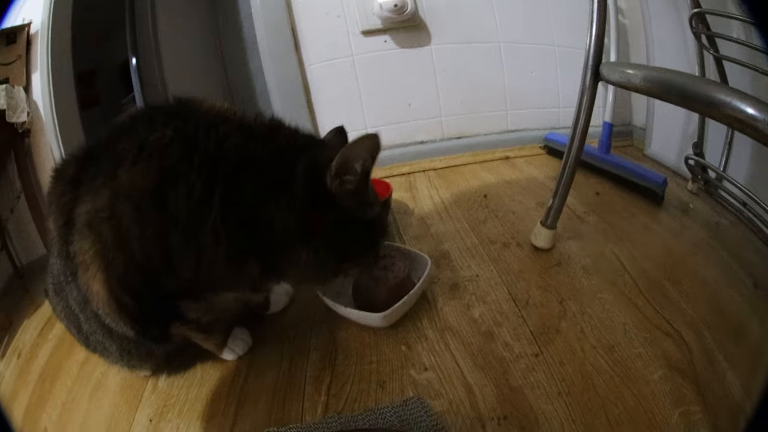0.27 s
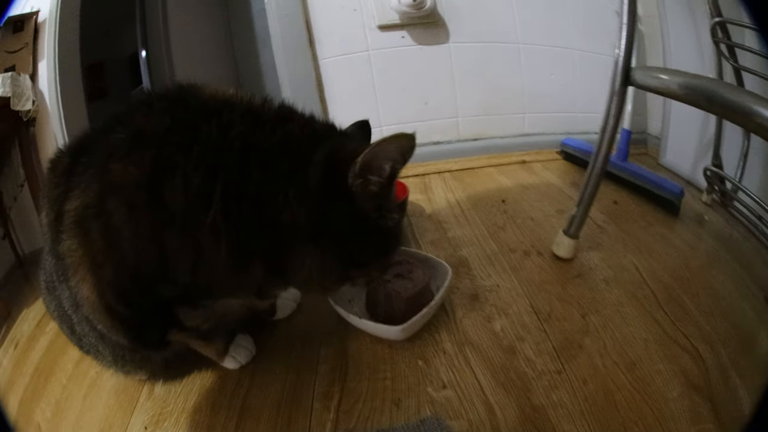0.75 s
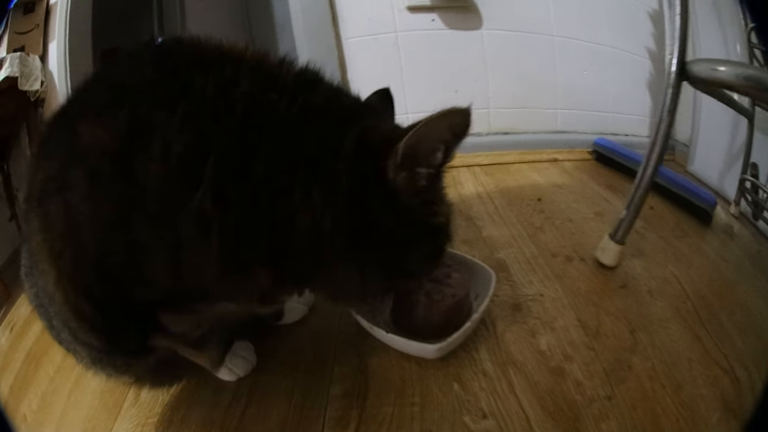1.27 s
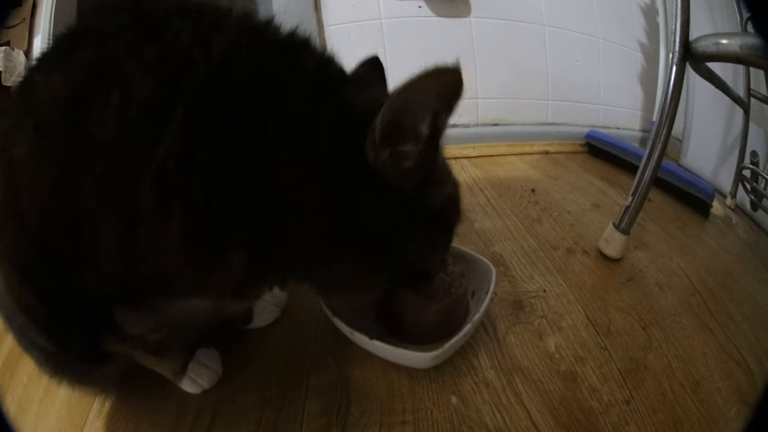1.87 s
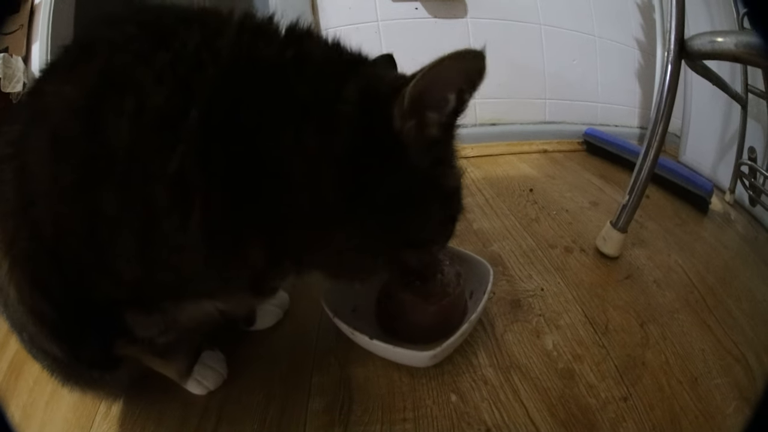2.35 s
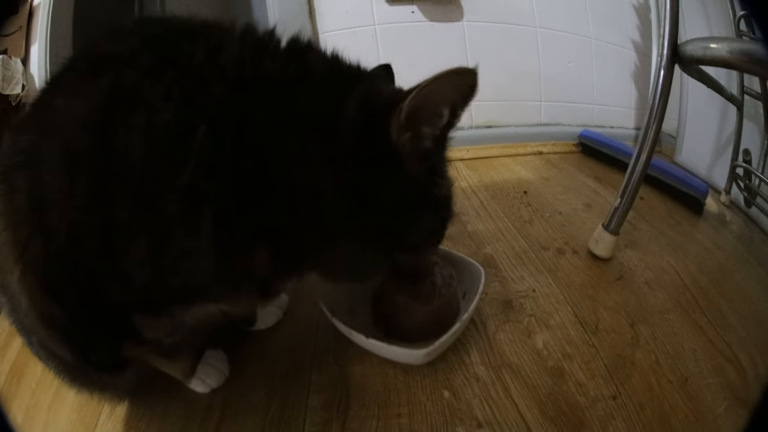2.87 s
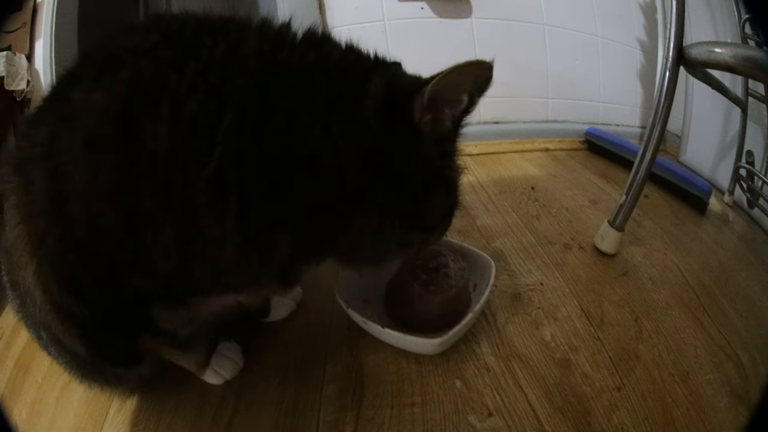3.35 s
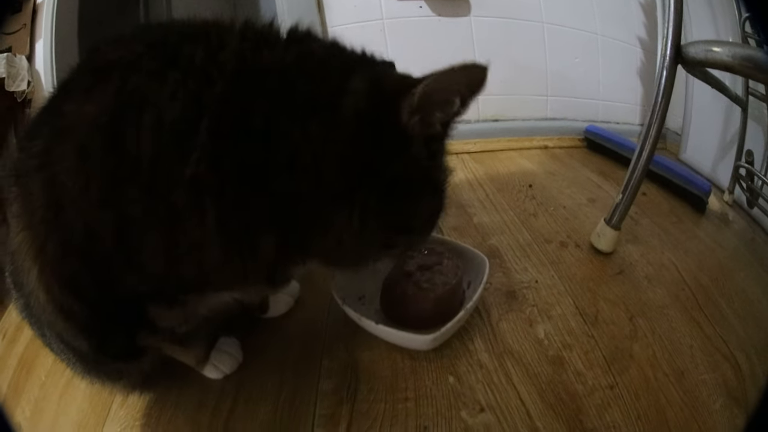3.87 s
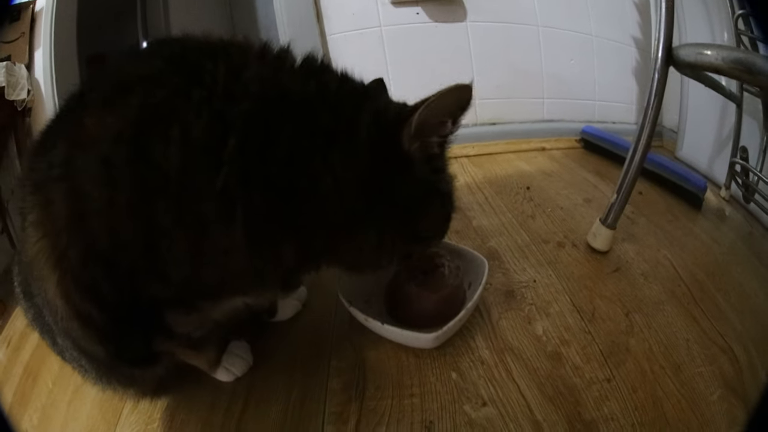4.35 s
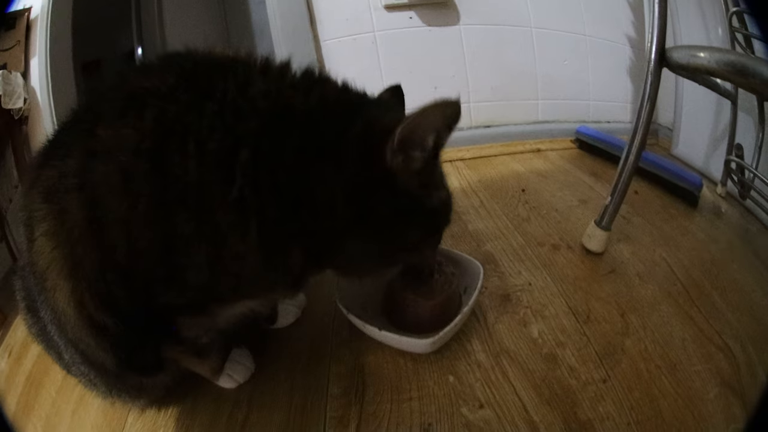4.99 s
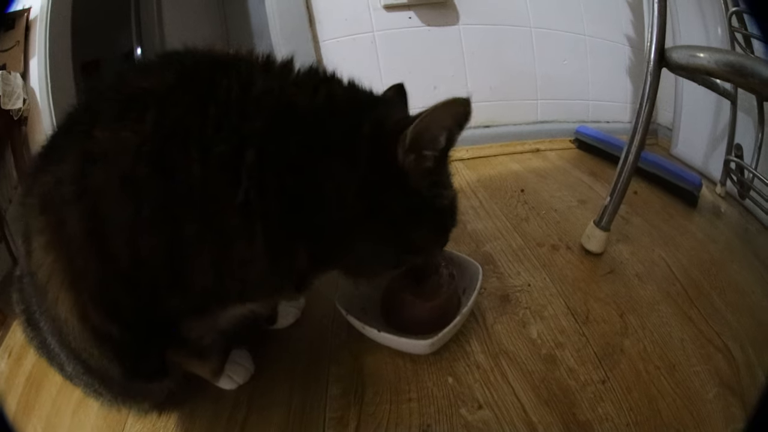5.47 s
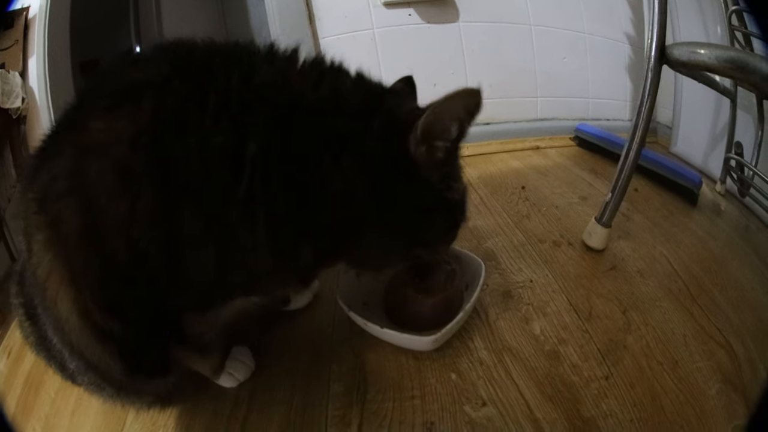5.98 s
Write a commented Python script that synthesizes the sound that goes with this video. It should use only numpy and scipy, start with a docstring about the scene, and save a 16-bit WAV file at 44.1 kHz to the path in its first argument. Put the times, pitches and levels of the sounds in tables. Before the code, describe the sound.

Close, wet cat chewing: irregular smacks and bright sticky ticks, small fizzy squelches, the bowl tapping and briefly scraping on the floor.

```python
"""A cat eats wet food from a plastic bowl on a kitchen floor, close to the microphone.
Pockets of air pop dully in its mouth and films of saliva snap brightly, each followed by smaller bursts;
in between, swells of tiny bubbles make the food squelch. The muzzle rocks the bowl, so its own notes ring
as it knocks on the floor, and once it slides with many small slips. Echoes and a short tail come from the
kitchen, over faint room air; a noise suppressor turns down the quietest parts."""
import sys
import numpy as np
from scipy import signal
from scipy.fft import rfft, irfft, next_fast_len
from scipy.io import wavfile
from scipy.ndimage import uniform_filter1d

SR = 44100
rng = np.random.default_rng(int(sys.argv[2]) if len(sys.argv) > 2 else 0)


def output_pcm(signal):
    """Save a mono or channel-first signal as 16-bit PCM at the path in sys.argv[1].

    Samples are clipped to [-1, 1] before scaling.
    """
    pcm = np.clip(np.atleast_2d(signal).T, -1, 1) * 32767
    wavfile.write(sys.argv[1], SR, np.round(pcm).astype(np.int16))


N = 274302  # length of the scene in samples
TAPS = 4096  # length of one short pulse in samples
HZ = np.fft.rfftfreq(TAPS, 1 / SR)  # the frequencies at which a pulse is shaped


def amp(db):
    """Turns decibels into a gain."""
    return 10 ** (np.asarray(db) / 20)


def evened(x):
    """Scales a signal to rms 1."""
    return x / np.sqrt(np.mean(x ** 2) + 1e-20)


def smoothed(grid, bins, frames):
    """Averages a grid over neighbouring frequency bins and time frames."""
    return uniform_filter1d(uniform_filter1d(grid, bins, 0), frames, 1)


def read(points, hz):
    """Reads a table of (Hz, value) points on a log-frequency axis."""
    f, value = np.transpose(points)
    return np.interp(np.log(hz + 1), np.log(f + 1), value)


def add(mix, s, sound):
    """Mixes a stereo sound in at time s, cutting off whatever falls outside the scene."""
    start = round(s * SR)
    sound = sound[:, max(-start, 0):]
    part = mix[:, max(start, 0):][:, :sound.shape[1]]
    part += sound[:, :part.shape[1]]


def coloured(x, points):
    """Filters a signal by a table of (Hz, dB) points."""
    size = x.shape[-1]
    return irfft(rfft(x) * amp(read(points, np.fft.rfftfreq(size, 1 / SR))), size)


def bump(hz, octaves, steep=1.13):
    """Gain of a heavily damped resonance; octaves sets how far it reaches to each side."""
    return (1 + (np.log2((HZ + 1) / hz) / octaves) ** 2) ** -steep


def above(hz, order):
    """Gain of a body that radiates little below its lowest note."""
    return (1 + (hz / (HZ + 1)) ** (2 * order)) ** -.5


def click(gain):
    """Pulse that starts at once, with this spectrum and the energy of one millisecond at rms 1."""
    log_gain = np.log(np.maximum(gain / gain.max(), 1e-4))
    circle = np.concatenate([log_gain, log_gain[-2:0:-1]])
    # the Hilbert transform gives the phase that packs the energy to the front (minimum phase)
    pulse = irfft(np.exp(np.conj(signal.hilbert(circle)))[:len(HZ)])
    return pulse * np.sqrt(SR / 1000 / np.sum(pulse ** 2))


def placed(x, pan_db, lag_s):
    """Makes stereo: left is pan_db louder than right, and lag_s later as the bowl lies to the right."""
    size = next_fast_len(len(x) + 64)
    turn = np.exp(-2j * np.pi * np.fft.rfftfreq(size, 1 / SR) * lag_s)
    late = irfft(rfft(x, size) * turn, size)[:len(x)]
    ears = np.array([late * amp(pan_db / 2), x * amp(-pan_db / 2)])
    return ears / np.sqrt(np.mean(amp([pan_db, -pan_db])))  # same total power wherever it sits


def grains(size, per_s, spread_db):
    """Sparse train of tiny bursts of uneven strength and random sign."""
    strength = amp(spread_db * np.minimum(rng.exponential(1, size), 4))
    return strength * rng.choice([-1, 1], size) * (rng.random(size) < per_s / SR)


def flurry(before_db, before_s, after_db, after_s, per_s):
    """One main impulse, a quarter of the way in, in a soft-edged spray of tiny ones that thins out to both sides."""
    t = (np.arange(TAPS) - TAPS // 4) / SR
    beads = grains(TAPS, per_s, spread_db=1.0)
    before = beads * (t < 0) * np.exp(-abs(t) / before_s)
    after = beads * (t > 0) * np.exp(-abs(t) / after_s)
    return (t == 0) + (amp(before_db) * evened(before) + amp(after_db) * evened(after)) / np.sqrt(TAPS)


def burst(hz, octaves, skirt, edge_octaves, uneven_db, edge_share=1.0, leak_db=-36, count=48):
    """A bubble or film gives way: a damped ring over a faint tick, cut off steeply underneath."""
    off = 2 * np.log2((HZ + 1) / hz) / octaves  # 1 at the half-power points of the ring
    ring = (1 + (2 ** (1 / skirt) - 1) * off ** 2) ** (-skirt / 2) + amp(leak_db)
    # random ripples in the spectrum: never twice the same shape
    shape = amp(uneven_db * evened(signal.resample(rng.standard_normal(count), len(HZ))))
    return click(shape * ring * above(hz * 2 ** -(edge_octaves + edge_share * octaves), order=9))


def cluster(row, skirt, edge_octaves, first_s, last_s, below_db, ceiling_db, fade_db_per_s,
            spread_db, spread_octaves, sag_octaves_per_s, count):
    """Smaller bursts after a main one, each at its own moment and pitch; they ring lower as the jaw opens."""
    s, hz, octaves, db, pan_db = row
    for _ in range(count):
        late = first_s + (last_s - first_s) * rng.uniform(0.12, 1) ** 2  # squared: most come early
        level_shift, pitch_shift, pan_shift = rng.uniform(-0.76, 1, 3)
        level = min(db + below_db, ceiling_db) - fade_db_per_s * late + spread_db * level_shift
        pitch = hz * 2 ** (spread_octaves * pitch_shift - sag_octaves_per_s * late)
        ring = burst(pitch, octaves / 2 + 0.2, skirt, edge_octaves, uneven_db=3.5)
        yield s + late, placed(amp(level) * ring, pan_db + 2 * pan_shift, lag_s=8e-5)


def quiet(level_db=-88, shared=1.0, patchy_db=4.0, patchy_hz=1500):
    """Faint air of the room, partly common to both ears; its low end comes and goes in patches."""
    # Colour of the still kitchen. Each row: frequency in Hz, level in dB.
    air_colour = [(15, -29), (25, -17), (76, -4), (175, -9.5), (373, -12), (700, -15), (1000, -19),
                  (1610, -20), (16000, -21.5)]
    air = rng.standard_normal((2, N)) + shared * rng.standard_normal(N)
    hz, _, z = signal.stft(coloured(air, air_colour), SR, nperseg=1024, noverlap=768)
    patches = evened(smoothed(rng.standard_normal(z.shape[1:]), bins=4, frames=12))
    z = z * amp(patchy_db * patches / (1 + (hz[:, None] / patchy_hz) ** 2))
    return amp(level_db) * evened(signal.istft(z, SR, nperseg=1024, noverlap=768)[1][:, :N])


def squelches(bubbles_per_s=1100, reach=2.0, pan_db=-1.5):
    """The tongue presses into the food, and a swell of minute bubbles bursts in the jelly."""
    # Each row: start in seconds, length in seconds, level in dB, centre in Hz, reach to each side in octaves.
    presses = [(0, 0.016, -53.5, 10500, 0.64), (0.708, 0.052, -75.5, 2200, 1.47),
               (0.412, 0.055, -71, 3520, 0.22), (0.413, 0.057, -81, 1410, 0.62),
               (0.571, 0.044, -66, 4870, 0.28), (0.962, 0.034, -68, 4580, .4),
               (0.992, 0.061, -72.5, 2260, 0.91), (0.993, 0.049, -65, 5400, 0.78),
               (1.1, 0.052, -75.5, 8000, 0.69), (1.336, 0.05, -53, 9100, 0.83),
               (1.462, 0.063, -78.5, 1230, 1.7), (1.469, 0.25, -68.5, 10400, 1.48),
               (1.734, 0.19, -74, 9400, 1.05), (2.227, 0.056, -89, 2176, 0.26),
               (2.793, 0.054, -88, 2120, 0.19), (3.271, 0.033, -76, 10500, 0.94),
               (3.277, 0.038, -82.5, 1714, 0.17), (3.42, 0.064, -76, 3400, 0.42),
               (3.883, 0.065, -82, 2010, 0.51), (5.066, 0.043, -84, 3400, 0.45),
               (5.349, 0.057, -56.5, 7300, 1.96), (6.11, 0.039, -64, 5940, 0.73)]
    out = np.zeros((2, N))
    for s, length, db, hz, octaves in presses:
        size = round(length * SR)
        ring = bump(hz, octaves, steep=1.3) * above(hz * 2 ** (-reach * octaves), order=4)
        fizz = signal.fftconvolve(grains(size, bubbles_per_s, spread_db=3.5), click(ring))[:size]
        swell = evened(fizz * signal.windows.tukey(size, .7))
        add(out, s, placed(amp(db) * swell, pan_db, lag_s=5e-5))
    return out


def pops(gain_db=-5.0, skirt=3.7, edge_octaves=0.21):
    """The tongue peels off the palate; the nearly shut mouth lets out only its cavity note."""
    # Pockets of air that pop. Each row: time in seconds, cavity note in Hz, width in octaves,
    # level in dB (the main pop also gets gain_db), left over right in dB.
    air_pockets = [(0.002, 5070, 0.37, -42.5, 0), (0.003, 2370, 0.22, -55, -4),
                   (0.1605, 3500, 0.23, -53, -4), (0.2059, 2400, 0.71, -32, -3.5),
                   (0.2837, 2800, 1.14, -29.5, -3), (0.293, 1844, 0.17, -29.5, -8.5),
                   (0.2943, 2770, 0.26, -30, -2), (0.3553, 2050, 0.37, -50, -2),
                   (0.414, 3200, 0.27, -48.5, 1), (0.5017, 3400, 0.94, -46, -2.5),
                   (0.5835, 4150, 0.54, -49, 2), (0.7282, 2300, 0.33, -52, -5), (0.739, 2174, 2.05, -62, 3),
                   (0.9775, 4230, 0.5, -45.5, -4), (1.0241, 3510, 0.98, -44.5, -3),
                   (1.244, 2790, 0.14, -51.5, -3), (1.2789, 2970, 0.57, -48.5, -6),
                   (1.3241, 2350, 0.49, -44, -8), (1.3624, 4200, 1.41, -43.5, -1),
                   (1.3976, 3700, 1.26, -43, -2.5), (1.51, 2310, 0.95, -56, -2),
                   (1.744, 2704, 0.17, -50.5, -3), (2.106, 3750, 0.31, -46.5, -8),
                   (2.117, 3120, 0.13, -48, -4), (2.13, 3390, 0.19, -60, -1),
                   (2.1298, 3470, 0.45, -35.5, -1.5), (2.147, 4450, 1.02, -43, -4),
                   (2.2138, 4740, 0.4, -45.5, -1), (2.2434, 2200, 0.35, -66, -6),
                   (2.2902, 2040, 0.3, -69.5, -4.5), (2.3777, 3750, 0.3, -44, -1.5),
                   (2.381, 3160, 0.22, -44.5, -4.5), (2.4715, 3910, 0.29, -40, -5),
                   (2.4819, 3980, 0.77, -37.5, -18), (2.487, 4700, 0.45, -30.5, 2),
                   (2.6544, 3110, 0.21, -42, -5), (2.8343, 2020, 0.24, -60.5, 0),
                   (2.9303, 3010, 0.54, -38, -1), (2.9368, 2940, 1.1, -40, -16),
                   (3.1656, 3400, 0.17, -47.5, -5), (3.1774, 3160, 0.23, -46.5, -1),
                   (3.1866, 2950, 0.44, -46.5, -9), (3.191, 3170, 0.28, -41, -1),
                   (3.21, 1800, 0.39, -46.5, -3.5), (3.2678, 3680, 0.14, -47, -1),
                   (3.3014, 1710, 0.15, -67.5, 0), (3.419, 3300, 0.24, -46, -1),
                   (3.4412, 3300, 0.34, -52.5, -11), (3.5857, 2380, 0.39, -41.5, -3.5),
                   (3.6753, 3530, 0.32, -61.5, 0), (3.7785, 2700, 0.39, -71, -10.5),
                   (3.8928, 2130, 0.21, -58, -8), (4.1485, 2730, 1.13, -45.5, 3),
                   (4.1653, 4040, 0.69, -22.0, 2), (4.1734, 3710, 1.27, -28.5, -2.5),
                   (4.248, 2220, 0.13, -48, -8), (4.5075, 3310, 0.63, -30, -3),
                   (4.5204, 5570, 0.3, -35, -2), (4.731, 5480, 0.26, -50.5, 2.5),
                   (4.797, 3430, 0.34, -48.5, 1), (4.8064, 3500, 0.32, -53, -21),
                   (4.9618, 1900, 0.27, -31, -5), (5.0852, 3270, 1.6, -62.5, -3.5),
                   (5.1896, 5040, 0.81, -43, 12), (5.4225, 3700, 0.5, -45, -1.5),
                   (5.4818, 2200, 0.6, -34, -1), (5.4866, 2200, 0.8, -36.5, -6.5),
                   (5.6165, 2600, 0.9, -47, -4), (5.6325, 3550, 0.36, -33.5, -2.5),
                   (5.674, 2500, 0.8, -41, -2), (5.8133, 1817, 0.25, -45, -6),
                   (5.9257, 3210, 0.13, -39.5, -0.5), (5.9937, 2760, 0.48, -50.0, -5.5),
                   (6.008, 2520, 0.45, -55, 0), (6.0511, 1727, 0.39, -39, -4.5),
                   (6.1289, 3330, 1.22, -43, -3), (6.147, 3560, 1.4, -56, 4),
                   (6.1595, 3430, 0.92, -39.5, -2.5)]
    out = np.zeros((2, N))
    for row in air_pockets:
        s, hz, octaves, db, pan_db = row
        drive = flurry(before_db=-23, before_s=0.009, after_db=-12, after_s=0.008, per_s=450)
        ring = burst(hz, octaves, skirt, edge_octaves, uneven_db=3.5)
        sound = amp(db + gain_db) * signal.fftconvolve(drive, ring)
        add(out, s - TAPS // 4 / SR, placed(sound, pan_db, lag_s=rng.uniform(-4e-6, 1e-4)))
        for small in cluster(row, skirt, edge_octaves, first_s=0.002, last_s=.04, below_db=-14.5,
                             ceiling_db=-53.5, fade_db_per_s=176.5, spread_db=0.0,
                             spread_octaves=0.16, sag_octaves_per_s=3.9, count=4):
            add(out, *small)
    return out


def snaps(gain_db=-1, skirt=4.1, edge_octaves=0.36):
    """A film of saliva breaks at the lips with one sharp tick; a few threads follow."""
    # Films that snap. Each row: time in seconds, centre in Hz, width in octaves,
    # level in dB (the main snap also gets gain_db), left over right in dB.
    films = [(0.2059, 9100, 0.88, -27, -3), (0.284, 9030, 0.37, -35, -3.5), (0.2946, 9100, 1.3, -29, -0.5),
             (0.355, 9560, 1.7, -48.5, 2), (0.5021, 8700, 0.22, -40.5, 1.5),
             (0.5198, 8700, 0.84, -47.5, -1.5), (0.5675, 12700, 0.66, -52, -2),
             (0.585, 13200, 0.47, -47, -5), (0.5999, 9000, 2.1, -50.5, -3), (0.9768, 9600, 0.5, -49, -3.5),
             (1.025, 8060, 0.61, -49.5, -2), (1.1253, 8550, 0.23, -63, -7), (1.3492, 7300, 0.74, -39, -6),
             (1.362, 8700, 0.42, -44.5, 1), (1.3712, 9800, 0.4, -39, -4), (1.3953, 6350, 1.07, -43.5, 3),
             (1.5508, 9100, 0.5, -38, -13), (1.564, 8080, 0.53, -45, 3), (1.5797, 7700, 0.57, -39, -9),
             (1.6324, 10600, 0.49, -49.5, -5), (1.8322, 6750, 0.8, -45, -2),
             (1.874, 10180, 0.69, -49.5, -7), (1.9279, 12000, 0.53, -48, -4),
             (1.9573, 11640, 0.39, -43.5, -7), (2.213, 6760, 1.37, -51.5, -4.5),
             (2.3811, 11300, 0.59, -47.5, -1.5), (2.4185, 7480, 0.99, -54, 9),
             (2.4792, 12000, 0.54, -25.5, 1), (2.4873, 9900, 1.93, -41.5, -2.5),
             (2.7708, 12260, 0.3, -48.5, -2.5), (2.9306, 10700, 0.35, -31, -25),
             (2.9478, 7760, 0.66, -27.5, -5), (3.2853, 9800, 0.33, -48, -4),
             (3.2992, 11370, 0.55, -48.5, 2), (3.522, 10180, 0.92, -39, -3), (3.559, 10530, 1.15, -43, -1),
             (3.5689, 9300, 0.69, -43.5, -1), (3.575, 9750, 1.15, -56, 0.5), (3.5864, 8630, 0.47, -58, -14),
             (3.8327, 13200, 0.35, -50, -5), (4.0223, 10660, 1, -54, 2), (4.15, 8300, 1.7, -52, -5),
             (4.1648, 6220, 1.5, -50, 8), (4.17, 6500, 2.1, -35, -3.5), (4.3145, 10500, 0.6, -43, 3.5),
             (4.407, 8600, 0.6, -35, -5), (4.4275, 10500, 0.6, -39, -6.5),
             (4.5448, 8970, 0.57, -39.5, -0.5), (4.6336, 9270, 0.72, -32, -1.5),
             (4.667, 10600, 1.1, -44.5, -3), (4.849, 8500, 0.44, -27, 0), (4.915, 9370, 0.73, -32, 1.5),
             (4.946, 10300, 0.47, -47, -23), (5.19, 7880, 0.62, -22.5, -2), (5.367, 7560, 0.4, -30, -3.5),
             (5.425, 10300, 0.22, -37.5, -3), (5.4818, 9600, 1.1, -33, -4), (5.484, 8300, 0.66, -29, 1),
             (5.6128, 10250, 0.71, -34, -1), (5.632, 11000, 0.14, -40, -5), (5.6637, 8730, 0.31, -33, -1.5),
             (5.6728, 8040, 0.24, -39.5, -1), (5.9009, 8340, 0.12, -40, -3), (6.0073, 8900, 0.2, -43, 1.5),
             (6.0136, 10050, 0.49, -55, -10), (6.1284, 7850, 0.25, -35, -7),
             (6.1482, 8800, 0.43, -42.5, -9), (6.162, 9300, 0.38, -43, 1), (6.1994, 8600, 0.28, -27, -5.5)]
    out = np.zeros((2, N))
    for row in films:
        s, hz, octaves, db, pan_db = row
        drive = flurry(before_db=-25, before_s=0.008, after_db=-10.5, after_s=0.017, per_s=700)
        ring = burst(hz, octaves, skirt, edge_octaves, uneven_db=2.0)
        sound = amp(db + gain_db) * signal.fftconvolve(drive, ring)
        add(out, s - TAPS // 4 / SR, placed(sound, pan_db, lag_s=rng.uniform(-2e-6, 9e-5)))
        for small in cluster(row, skirt, edge_octaves, first_s=0.0013, last_s=0.031, below_db=-11.5,
                             ceiling_db=-48, fade_db_per_s=153.0, spread_db=4.5,
                             spread_octaves=0.45, sag_octaves_per_s=1.7, count=3):
            add(out, *small)
    return out


def knocks(gain_db=-1, thud_db=-8, soft_hz=420, soft_octaves=0.48, widening=2.0, uneven_db=4.0, detune=0.037):
    """The bowl tips on the floor: a ragged push rings its modes over a dead thud; higher knocks are wider."""
    # Each row: time in seconds, level in dB before gain_db, centre in Hz, left over right in dB.
    tips = [(0.2072, -34.5, 714, -4), (0.214, -45.5, 250, 1.5), (0.733, -64.5, 854, 5),
            (1.61, -48.5, 600, 1.5), (1.632, -57, 704, 2.5), (1.659, -42, 400, -0.5),
            (2.255, -55, 341, 2.5), (2.5402, -42, 398, -0.5), (2.8693, -39, 820, -7),
            (2.877, -45.5, 780, -9), (2.938, -48, 457, -3.5), (3.002, -57.5, 480, -5), (3.049, -46, 396, 0),
            (4.347, -57.5, 433, 3.5), (4.681, -69, 302, -3), (4.966, -43.5, 368, -3.5)]
    # Notes of the bowl on the floor. Each row: frequency in Hz, width in Hz, level in dB.
    bowl_modes = [(214, 35, 4), (333, 8.4, -2), (369.7, 6.6, 1), (507, 40, 3.5), (570, 32, 3),
                  (766, 88, 1.5), (1120, 90, -1), (1620, 83, -10), (1900, 200, -13)]
    out = np.zeros((2, N))
    for s, db, hz, pan_db in tips:
        power = amp(thud_db) ** 2
        for mode_hz, width, mode_db in bowl_modes:
            # the bowl sits a little differently each time, so its modes shift in strength and pitch
            level_shift, pitch_shift = rng.uniform(-0.86, 1, 2)
            off = 2 * (HZ - mode_hz * (1 + detune * pitch_shift)) / width
            power = power + amp(mode_db + uneven_db * level_shift) ** 2 / (1 + off ** 2)
        body = np.sqrt(power) * above(110, order=3)
        ring = click(body * bump(hz, soft_octaves * (hz / soft_hz) ** widening, steep=1.235))
        push = flurry(before_db=-20, before_s=0.018, after_db=-3.0, after_s=0.016, per_s=920)
        sound = amp(db + gain_db) * signal.fftconvolve(push, ring)
        add(out, s - TAPS // 4 / SR, placed(sound, pan_db, lag_s=2e-4))
    return out


def slide(slips_per_s=6000, ramp_share=0.78, pan_db=-3):
    """The foot of the bowl catches and slips on the grain of the floor; each shove swells and dies."""
    # The muzzle shoves the bowl. Each row: start in seconds, length in seconds, level in dB.
    shoves = [(2.856, 0.13, -44), (2.98, 0.089, -44)]
    # Colour of the scraping. Each row: frequency in Hz, level in dB.
    scrape_colour = [(150, -41.5), (250, -16), (484, -13.5), (875, -23), (1100, -16.5), (3120, -14.5),
                     (3400, -10), (4570, -9.5), (10200, -4), (14200, -14), (16000, 4)]
    out = np.zeros((2, N))
    for s, length, db in shoves:
        size = round(length * SR)
        slips = evened(coloured(grains(SR, slips_per_s, spread_db=4.0), scrape_colour))[:size]
        swell = slips * signal.windows.tukey(size, ramp_share)
        add(out, s, placed(amp(db) * swell, pan_db, lag_s=8e-5))
    return out


def kitchen(x, onset_s=0.00023, echo_hz=3000, mono_hz=700, scatter_db=-6, scatter_peak_s=0.00195):
    """Scatter from bowl and floor, a few dull echoes, then a short diffuse tail."""
    # How long the room rings. Each row: frequency in Hz, time to fall by 60 dB in seconds.
    ring_times = [(200, 0.29), (530, 0.25), (1400, 0.24), (3700, 0.27), (9700, 0.22), (16000, 0.24)]
    # Room against direct sound. Each row: frequency in Hz, level in dB.
    room_levels = [(200, -0.5), (500, -11.5), (1400, -2), (3500, -10), (8000, -8), (15000, -12.5)]
    # Bowl rim, wall and furniture. Each row: delay in seconds, level in dB.
    reflections = [(.0029, -13), (.0062, -17.5), (.0088, -21.5), (0.0173, -18)]
    t = np.arange(SR // 2) / SR
    hz, at, z = signal.stft(rng.standard_normal((2, len(t))), SR, nperseg=256)
    same = (1 / (1 + (hz / mono_hz) ** 2))[:, None]  # long waves reach both ears alike
    z[1] = same * z[0] + np.sqrt(1 - same ** 2) * z[1]
    t60 = read(ring_times, hz)[:, None]
    decay = amp(read(room_levels, hz)[:, None] - 60 * at / t60)
    z *= decay * np.sqrt(2 * np.log(1000) / (t60 * SR))  # same energy however long it rings
    tail = signal.istft(z, SR, nperseg=256)[1][:, :len(t)] * (1 - np.exp(-t / onset_s))

    scatter = rng.standard_normal(tail.shape) * t * np.exp(-t / scatter_peak_s)
    scatter = signal.lfilter(*signal.butter(2, mono_hz, "high", fs=SR), scatter)
    tail += amp(scatter_db) * evened(scatter) / np.sqrt(len(t))

    echoes = np.zeros(len(t))
    for delay, db in reflections:
        echoes[round(delay * SR)] += amp(db)
    tail += signal.lfilter(*signal.butter(1, echo_hz, fs=SR), echoes)
    return x + signal.fftconvolve(x, tail, axes=1)[:, :N]


def suppressed(x, depth_db=11, knee_db=4):
    """A noise suppressor turns down whatever lies near or below its threshold, at each pitch by itself."""
    # Each row: frequency in Hz, threshold in dB per frequency bin.
    threshold = [(100, -91.5), (600, -99), (1100, -102), (2000, -107), (16000, -109)]
    hz, _, z = signal.stft(x, SR, nperseg=512, noverlap=384)
    power = smoothed((abs(z) ** 2).mean(0), bins=5, frames=5)
    level_db = 10 * np.log10(abs(power) + 1e-20)
    shut = .5 - .5 * np.tanh((level_db - read(threshold, hz)[:, None]) / knee_db)  # 0 open, 1 shut
    return signal.istft(z * amp(-depth_db * shut), SR, nperseg=512, noverlap=384)[1][:, :N]


def scene():
    """Cat and bowl in the kitchen."""
    return kitchen(pops() + snaps() + squelches() + knocks() + slide()) + quiet()


def record(dry, edge_hz=16500):
    """The small microphone lifts the mids and loses the top; then noise suppression and the band limit."""
    # Each row: frequency in Hz, gain in dB.
    microphone = [(100, 9.5), (1000, 15.5), (6000, 4.5), (10000, 1), (13000, 5.5), (14500, -1.0), (16000, -13.5)]
    heard = suppressed(coloured(dry, microphone))
    band_limit = signal.firwin(511, edge_hz, window=("kaiser", 9), fs=SR)
    return signal.oaconvolve(heard, band_limit[None], "same")


dry = scene()
out = record(dry)
output_pcm(out)
```